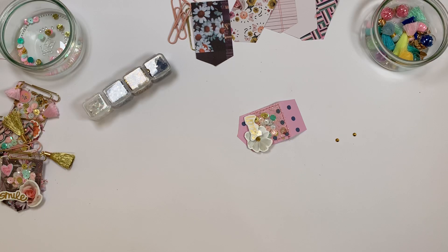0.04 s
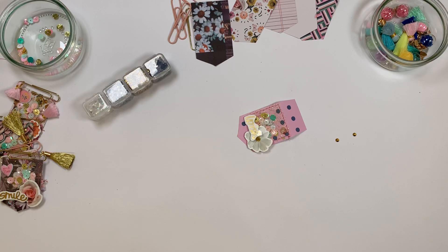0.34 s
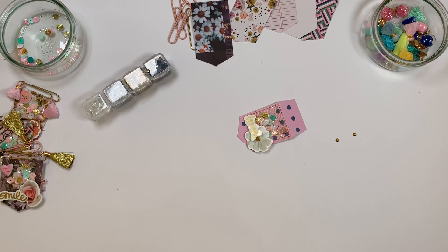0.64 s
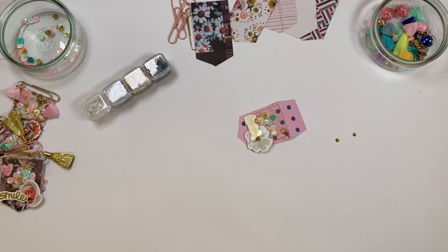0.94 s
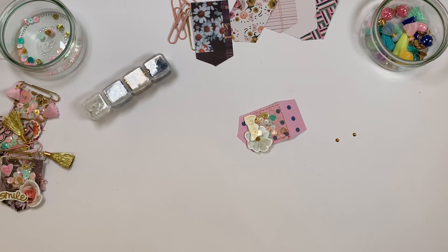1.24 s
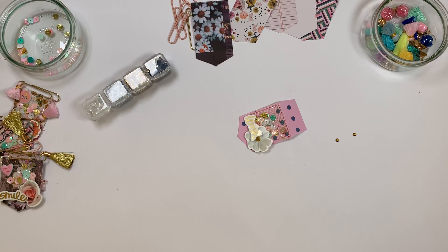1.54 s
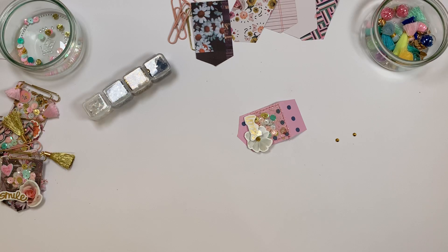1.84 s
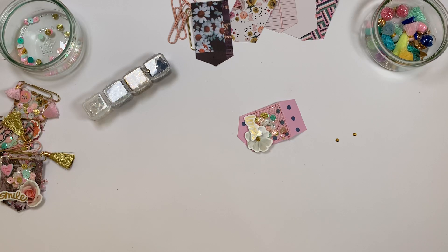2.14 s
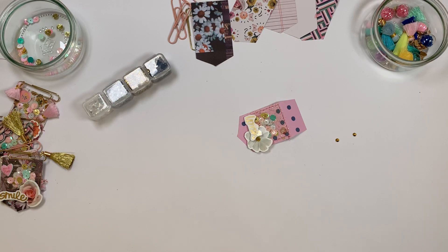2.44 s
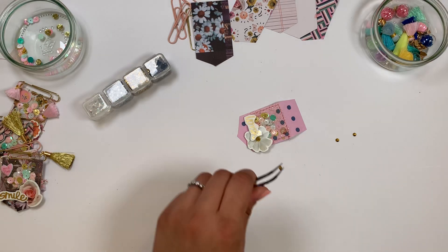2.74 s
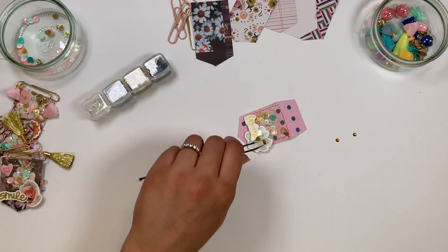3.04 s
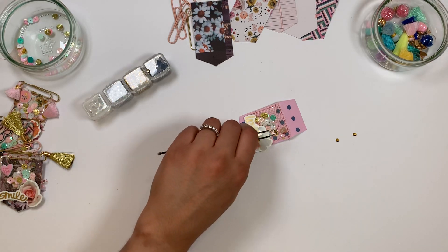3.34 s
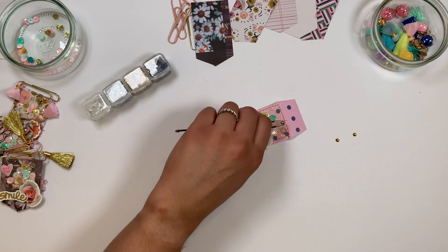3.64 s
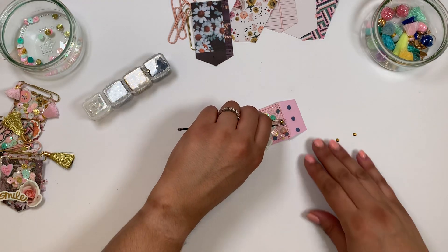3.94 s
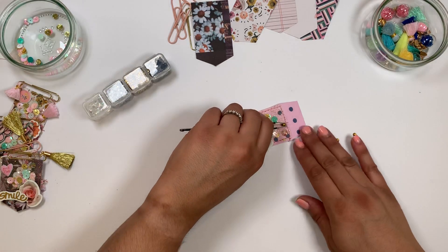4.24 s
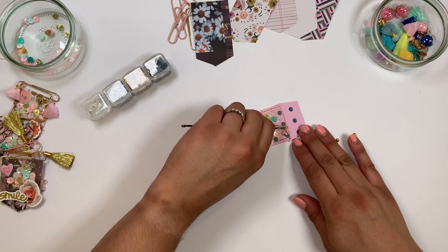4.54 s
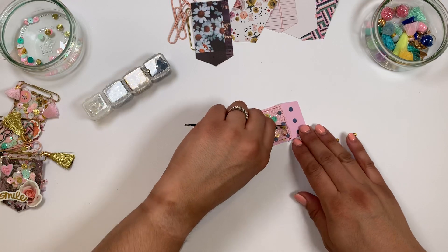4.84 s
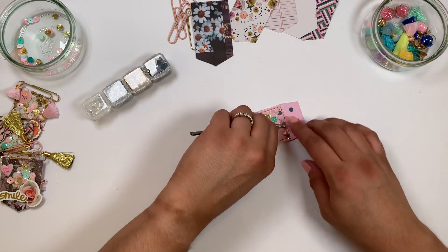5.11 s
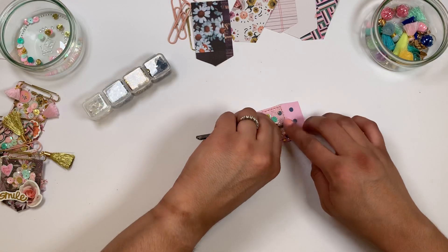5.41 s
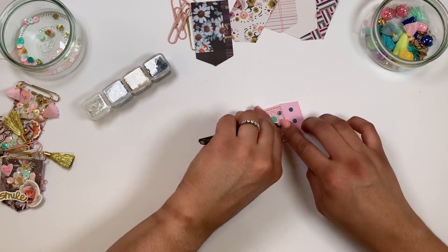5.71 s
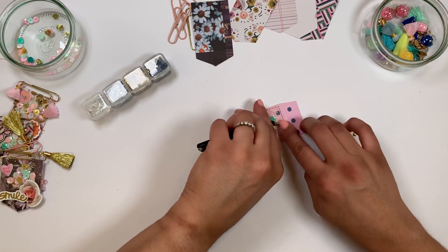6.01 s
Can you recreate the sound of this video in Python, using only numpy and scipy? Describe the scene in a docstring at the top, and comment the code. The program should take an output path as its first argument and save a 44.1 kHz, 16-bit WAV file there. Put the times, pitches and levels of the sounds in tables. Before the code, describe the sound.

A phone above a craft table picks up low ventilation rumble and hum, alone at first. Hollow plastic clacks from a glue gun mix with light metallic clicks of tweezers being picked up. A thump and brief chattering skid follow as the gun is set down, then a knock on the table. The rest is quieter: scattered ticks on beads, soft pats and rubs on a paper tag, and tiny fingernail squeaks.

```python
"""Craft work on a tabletop, over the air rumble and low motor hum of a small room.
From 2 s a hot glue gun clacks in its hollow plastic shell, and steel tweezers click and ring as they
are snatched up. Near 3 s the gun lands with a thump and a short skid, then a hand knocks on the table.
From 4 s nails and tweezer tips tick on small beads and a paper tag while fingers rub over the card.
A phone above the table hears it all through two closely spaced ports."""
import sys
import numpy as np
from scipy import signal
from scipy.fft import rfft, irfft
from scipy.io import wavfile

SR = 44100
rng = np.random.default_rng(int(sys.argv[2]) if len(sys.argv) > 2 else 0)


def unload_wav(signal):
    """Save mono or channel-first audio to the path in sys.argv[1] as 16-bit WAV at rate SR, clipped to [-1, 1]."""
    wavfile.write(
        sys.argv[1],
        SR,
        np.round(np.clip(np.atleast_2d(signal).T, -1, 1) * 32767).astype(np.int16),
    )


N = 271960
TIME = np.arange(N) / SR

# Clacks of the glue gun. Each row: start in seconds, level in dB, contact cutoff in Hz.
GUN_CLACKS = [(1.985, -43, 1694), (2.1828, -17.5, 1300), (2.259, -41, 2700), (2.3858, -25, 2000),
              (2.9275, -25, 840), (3.004, -27, 1610)]
# Its plastic shell. Each row: pitch in Hz, level in dB, t60 in seconds.
GUN_MODES = [(880, -10, 0.0048), (1139, -5, 0.02), (1584, -10, 0.019), (2000, -3.5, 0.006),
             (2760, 0.5, 0.013), (3920, -21, 0.006), (7000, -22.5, .006)]
# Its skid. Each row: start in seconds, level in dB, tilt in dB per octave, chatter t60 in seconds.
GUN_SKIDS = [(3.007, -30.5, -3, 0.18)]
# The skid's EQ. Each row: frequency in Hz, gain in dB.
SKID_EQ = [(500, -14.5), (950, -18), (1200, 0), (1550, -0.5), (1900, -6.5), (2550, 1.5), (3000, 6),
           (3400, -15), (5400, -20), (7000, -44)]

# Gun and hand hit the table. Each row: start in seconds, level in dB, contact cutoff and low cut in Hz.
TABLE_BLOWS = [(2.667, -36.5, 280, 149), (2.95, -34.5, 1270, 60), (2.9602, -5.5, 78, 56),
               (2.978, -20.5, 79.4, 54.7), (3.02, -13.5, 81.4, 55.4), (3.162, -37, 1250, 200),
               (3.1832, -12, 1210, 244), (3.192, -17.5, 173, 69.4), (3.212, -16.5, 201, 102)]
# The tabletop's boom. Each row: pitch in Hz, level in dB, t60 in seconds.
TABLE_MODES = [(75.1, -10.5, 0.21), (94.5, -30.5, 0.45), (123.7, -6, 0.23), (207.3, -13, 0.27),
               (321, -2.5, 0.048), (414, 0.5, 0.066), (442, -1.5, 0.03), (598, -15, 0.068),
               (680, -13, 0.04), (927, -13, 0.02), (1125, -9, 0.012), (1463, -10.5, 0.021),
               (1740, -5, 0.0029)]

# Tweezers touch the table.
# Each row: start in seconds, level in dB, tilt in dB per octave, chatter t60 in seconds.
TWEEZER_CLICKS = [(2.3268, -45.5, -4, 0.014), (2.552, -27, 5, 0.0048), (2.6585, -43, -5.5, 0.016),
                  (2.738, -49, -3.5, 0.054), (2.9514, -43.5, -2.5, 0.06), (3.0038, -36, -6, 0.0074),
                  (3.182, -47.5, -5.5, 0.03), (3.7535, -55.5, 3, 0.019)]
# The click's EQ. Each row: frequency in Hz, gain in dB.
TWEEZER_EQ = [(500, -15.5), (1100, 2.5), (1800, -1.5), (2500, -1.5), (3000, -10.5), (3500, -1.5),
              (4300, 0.5), (5300, -7.5), (6400, -16.5), (7400, -11.5), (8500, -9), (12500, -15),
              (15500, -20.5)]
# Hits that set the arms ringing. Each row: start in seconds, level in dB, contact cutoff in Hz.
TWEEZER_BLOWS = [(2.5524, -31, 11400), (2.6585, -51, 6950), (3.0038, -47.5, 5200)]
# The two steel arms. Each row: pitch in Hz, level in dB, t60 in seconds.
TWEEZER_MODES = [(970, -4, 0.013), (1350, 0, 0.0066), (1520, -16, 0.13), (1727, -14, 0.059),
                 (2060, -1.5, 0.006), (3200, 2.5, 0.00515), (3870, -13.5, 0.0057), (5010, 5.5, 0.0087),
                 (5300, -30.5, 0.3), (5500, -28, 0.282), (5550, 11.5, 0.0028), (6960, -30, 0.2),
                 (7580, 8.5, 0.0046)]
# The tips drag. Each row: start and length in seconds, level in dB, tilt in dB per octave.
TWEEZER_DRAGS = [(2.66, 0.026, -54.5, -4), (2.974, 0.022, -50, 0), (3.158, 0.028, -47.5, -10.5),
                 (3.212, 0.015, -74, -0.5)]
# The drag's EQ. Each row: frequency in Hz, gain in dB.
DRAG_EQ = [(200, -22), (600, -4), (1300, -0.5), (2200, -2.5), (3000, 3), (3500, -2), (4300, 2.5),
           (5400, -6.5), (7800, -8.5), (13000, -11), (15500, -14)]

# Nails and tips tick on beads and card.
# Each row: start in seconds, level in dB, tilt in dB per octave, push on the card in dB.
BEAD_TICKS = [(4.1329, -61, 0, -59), (4.444, -36, 5.5, -39.5), (4.6296, -70, 6, -51),
              (4.925, -47, -3.5, -54.5), (4.933, -53, -5, -62), (4.95, -57, -3, -53), (5.463, -66, -3, -68),
              (5.582, -63.5, 0, -52), (5.687, -58, -2.5, -61), (5.7604, -46, -1, -38.5),
              (5.814, -54.5, 4, -44.5), (6.03, -62, 13, -62), (6.0915, -59, 0, -40.5),
              (6.1102, -47.5, 4.5, -38.5), (6.1173, -45, 4, -38), (6.1227, -27, 11.5, -35),
              (6.1332, -57, 5, -40)]
# The tick's EQ. Each row: frequency in Hz, gain in dB.
TICK_EQ = [(500, -3), (950, -8), (1350, -2), (1700, 4.5), (2050, -1.5), (2700, 4), (3900, 0.5), (5200, -8),
           (6700, -1), (7800, -2.5), (9000, -1.5), (10500, -8), (12000, -7), (14600, -16), (16000, -14)]
# Square hits on a bead. Each row: start in seconds, level in dB, contact cutoff in Hz.
BEAD_BLOWS = [(4.4448, -39, 9000), (4.843, -55, 3340), (6.1227, -50, 5930)]
# A hard little bead. Each row: pitch in Hz, level in dB, t60 in seconds.
BEAD_MODES = [(2630, 1.5, 0.011), (3240, 4.5, 0.004), (4020, 4.5, 0.0046), (4640, -1, 0.0052),
              (6680, 4, 0.006)]
# The card pressed on the table. Each row: pitch in Hz, level in dB, t60 in seconds.
CARD_MODES = [(285, -5.5, 0.074), (469, -3.5, 0.059), (558, -2.5, 0.029), (819, -10, 0.074),
              (1366, -5, 0.017), (2230, -8, 0.013)]
# A nail on the card. Each row: start and length in seconds, level in dB, tilt in dB per octave.
NAIL_RASPS = [(4.05, 0.018, -78.5, -6), (4.927, 0.017, -66.5, -8), (4.962, 0.033, -78, -2),
              (5.076, 0.013, -76, 0), (5.684, 0.004, -76, 3), (5.7601, 0.002, -67, 6)]
# The rasp's EQ. Each row: frequency in Hz, gain in dB.
RASP_EQ = [(500, -48), (3500, -24), (5700, -10), (6500, -1), (7200, 1), (8300, -11), (10000, -26.5),
           (15000, -26)]
# Fingers slide over the card. Each row: fastest moment in seconds, level in dB.
FINGER_STROKES = [(4.06, -74), (4.15, -72.5), (4.951, -75), (5.087, -75.5), (6.15, -66.5)]
# The rub's EQ. Each row: frequency in Hz, gain in dB.
RUB_EQ = [(500, -4), (2000, 11), (3500, 5.5), (5300, -3.5), (6400, -9.5), (7500, -8), (9000, 0),
          (15000, -10)]

# The room's reverb. Each row: frequency in Hz, t60 in seconds, tail level in dB.
ROOM_REVERB = [(102, 1, -5), (405, 0.36, -8), (1193, 0.34, 3), (2520, 0.88, -5.5), (3970, 0.36, -4.5),
               (6780, 0.36, -10.5), (14700, 0.18, -4.5)]
# How alike diffuse sound is at the two ports. Each row: frequency in Hz, correlation.
PORT_LIKENESS = [(60, 0.96), (280, 0.76), (480, 0.4), (750, 0.0169), (6000, 0.012), (7200, 0.99),
                 (9000, 0.9), (10300, 1), (12000, 1), (13500, 1)]
# Ventilation rumble and faint hiss. Each row: frequency in Hz, noise density in dB per Hz.
AIR_SPECTRUM = [(15, -77), (26, -64.5), (36, -69), (70, -72), (125, -74.5), (160, -84), (290, -88.5),
                (450, -93), (1100, -97.5), (2100, -104), (3700, -120), (6400, -126), (8400, -123.5),
                (14300, -128.5), (15300, -139)]
# Motor hum. Each row: pitch in Hz, level in dB.
HUM_TONES = [(97, -60), (120, -61)]


def glue_gun():
    """The hollow shell clacks, then chatters in a short skid as it is put down."""
    clacks = struck(GUN_CLACKS, GUN_MODES, scatter=0.02)
    skid = clicks(GUN_SKIDS, SKID_EQ, grit_db=3.5, snap_s=0.0016, rise_share=0.014, size=16384)
    return clacks + skid


def table_thumps():
    """A light, hard knock rings the hollow middle modes; only a heavy push moves the deep ones."""
    out = np.zeros(N)
    for start, level_db, cutoff_hz, low_cut_hz in TABLE_BLOWS:
        thump = struck([(start, level_db, cutoff_hz)], TABLE_MODES, scatter=0.004)
        low_cut = signal.butter(2, low_cut_hz, "highpass", fs=SR, output="sos")
        out += signal.sosfilt(low_cut, thump + 1e-18)
    return out


def tweezer_clicks():
    """Steel clicks on the table; some hits leave a few thin tones hanging in the arms."""
    contacts = clicks(TWEEZER_CLICKS, TWEEZER_EQ, grit_db=0, snap_s=0.0039)
    return contacts + struck(TWEEZER_BLOWS, TWEEZER_MODES, scatter=0.001)


def tweezer_scratches():
    """The steel tips scratch over table and card."""
    return drags(TWEEZER_DRAGS, DRAG_EQ, grit_db=2.5, bite_s=0.00078, release_s=0.0068)


def bead_ticks(snap_t60=0.0063, settle_after_s=0.006, settle_db=-10.5, settle_t60=0.079):
    """A bead snaps, then settles with a softer, longer chatter; a square hit makes it ring."""
    snaps = [(start, db, tilt, snap_t60) for start, db, tilt, _ in BEAD_TICKS]
    settles = [(start + settle_after_s, db + settle_db, tilt, settle_t60)
               for start, db, tilt, _ in BEAD_TICKS]
    ticks = clicks(snaps + settles, TICK_EQ, grit_db=-3, snap_s=0.0034)
    return ticks + struck(BEAD_BLOWS, BEAD_MODES, scatter=0.0088)


def card_pats(cutoff_hz=2380):
    """The soft fingertip push behind each tick pats the card against the table."""
    pushes = [(start, push_db, cutoff_hz) for start, _, _, push_db in BEAD_TICKS]
    return struck(pushes, CARD_MODES, scatter=0.02)


def nail_rasps():
    """A fingernail catches on the card with a thin squeak."""
    return drags(NAIL_RASPS, RASP_EQ, grit_db=2.5, bite_s=0.0011, release_s=0.008)


def finger_rub(grit_db=5, down_s=3.9, resting_db=-83.5, rise_s=0.058, fall_s=0.027):
    """Skin catches on the paper grain in tiny slips: short strokes over a faint, steady shifting."""
    slips = rng.standard_normal(N) * undb(grit_db * rng.standard_normal(N))
    rub = irfft(rfft(slips) * undb(curve(RUB_EQ, bins(N))), N)
    effort = undb(resting_db) * np.clip(TIME - down_s, 0, 1)  # resting fingers never lie quite still
    for peak_s, level_db in FINGER_STROKES:
        stroke = np.exp(-np.maximum((peak_s - TIME) / rise_s, (TIME - peak_s) / fall_s))
        effort += undb(level_db) * stroke
    return rub / rub.std() * effort


def struck(blows, modes, scatter, size=22050):
    """Blows ring a body; a soft contact leaves the high modes quiet."""
    out, t = np.zeros(N), TIME[:size]
    hz, db, t60 = np.transpose(modes)[:, :, None]
    sign = (-1) ** np.arange(len(modes))[:, None]  # neighbouring modes swing against each other
    for start, level_db, cutoff_hz in blows:
        detune = 1 + scatter * rng.standard_normal(hz.shape)
        partials = sign * undb(db) * decay(t, t60) * np.sin(2 * np.pi * hz * detune * t)
        contact = signal.butter(3, min(cutoff_hz, SR / 3), fs=SR, output="sos")
        add(out, start, undb(level_db) * signal.sosfilt(contact, partials.sum(axis=0)))
    return out


def clicks(events, eq, grit_db, snap_s, rise_share=0.035, size=4096):
    """Hard little contacts: one impact and a fading chatter, coloured by the object."""
    out, t = np.zeros(N), TIME[:size]
    for start, level_db, tilt_db, t60 in events:
        push, weight = rng.standard_normal((2, size))
        attack = 1 - np.exp(-t / (rise_share * t60))  # a long scrape takes longer to bite
        envelope = decay(t, t60) * attack
        force = push * undb(grit_db * weight) * envelope
        # the briefer the contact, the more of it lies in the main impact
        force[np.argmax(envelope)] += np.linalg.norm(force) * snap_s / t60
        click = signal.fftconvolve(force, minimum_phase(tilted_eq(eq, tilt_db, size)))
        packed_rms = np.sqrt(np.sum(click ** 2) * 1000 / SR)  # all its energy in one millisecond
        add(out, start, undb(level_db) * click / packed_rms)
    return out


def drags(events, eq, grit_db, bite_s, release_s, size=8192):
    """A dragged tip makes a dense run of tiny slips until it lifts off."""
    out, t = np.zeros(N), TIME[:size]
    for start, length_s, level_db, tilt_db in events:
        push, weight = rng.standard_normal((2, size))
        force = push * undb(grit_db * weight)
        slips = irfft(rfft(force) * tilted_eq(eq, tilt_db, size))
        pressure = (1 - np.exp(-t / bite_s)) * np.exp(-np.maximum(t - length_s, 0) / release_s)
        add(out, start, undb(level_db) * pressure * slips / slips.std())
    return out


def room(sound, early_db, early_t60, walls_db, pan_db, wall_rise_s=0.00041, size=32768):
    """Direct sound, quick scatter off things on the table, and the walls' tail, octave by octave."""
    t, hz = TIME[:size], bins(size)
    centres = np.geomspace(60, 15360, 9)
    noise, tail = diffuse(size), 0
    for centre, band_gains in zip(centres, np.eye(len(centres))):
        band = irfft(noise * curve(np.c_[centres, band_gains], hz))
        fade = decay(t, curve(ROOM_REVERB, centre)) * (1 - np.exp(-t / wall_rise_s))
        tail += band * fade / np.linalg.norm(fade) * undb(curve(ROOM_REVERB, centre, column=2))
    low_cut = hz ** 2 / (hz ** 2 + 800 ** 2)  # long waves pass small things by
    fade = decay(t, early_t60)
    early = irfft(diffuse(size) * low_cut) * fade / np.linalg.norm(fade)
    direct = 1 / np.hypot(1, undb(early_db))  # what scatters is lost to the direct path
    pan = undb(np.array([[pan_db], [-pan_db]]) / 2)
    reverb = undb(walls_db) * tail + direct * undb(early_db) * early
    return direct * pan * sound + signal.fftconvolve(sound[None], reverb, axes=1)[:, :N]


def motor_hum(waver=0.94, smoothing_samples=8000):
    """Two low motor tones waver in level and phase."""
    window = np.hanning(smoothing_samples)[None]
    window /= np.linalg.norm(window)
    hum = np.zeros(N)
    for hz, db in HUM_TONES:
        swell, drift = signal.fftconvolve(rng.standard_normal((2, N)), window, "same", axes=1)
        hum += np.sqrt(2) * undb(db) * (1 + waver * swell) * np.sin(2 * np.pi * hz * TIME + drift)
    return hum


def ventilation():
    """Moving air lays a steady bed of rumble and faint hiss."""
    return irfft(diffuse(N) * undb(curve(AIR_SPECTRUM, bins(N))), N) * np.sqrt(SR / 2)


def diffuse(size):
    """Spectra of white noise reaching the two ports from all sides."""
    alike = np.clip(curve(PORT_LIKENESS, bins(size)), 0, 0.995)
    mid, side = rfft(rng.standard_normal((2, size)))
    return np.sqrt((1 + alike) / 2) * mid + np.sqrt((1 - alike) / 2) * side * np.array([[1], [-1]])


def tilted_eq(eq, tilt_db, size):
    """Gains of an EQ tilted around 5 kHz; the tilt levels off below 500 Hz."""
    hz = bins(size)
    octaves = np.log2(np.maximum(hz, 500) / 5000)
    return undb(curve(eq, hz) + tilt_db * octaves)


def minimum_phase(gain):
    """The tightest impulse response with this gain curve."""
    cepstrum = irfft(np.log(gain))
    half = len(cepstrum) // 2
    cepstrum[1:half] *= 2
    cepstrum[half + 1:] = 0
    return irfft(np.exp(rfft(cepstrum)))


def decay(t, t60):
    """A fade that falls 60 dB in t60 seconds."""
    return np.exp(-np.log(1000) * t / t60)


def undb(db):
    """Decibels to gain."""
    return 10 ** (np.asarray(db) / 20)


def curve(points, hz, column=1):
    """Read a table's column on a log-frequency axis."""
    table = np.transpose(points)
    return np.interp(np.log(np.maximum(hz, 1)), np.log(table[0]), table[column])


def bins(size):
    """Frequencies of a spectrum of this many samples."""
    return np.fft.rfftfreq(size, 1 / SR)


def add(track, start_s, sound):
    """Mix a sound in at its cue."""
    start = int(start_s * SR)
    track[start:start + len(sound)] += sound[:N - start]


def scene():
    """Each source gets its own pan and share of the room, over the air and the hum."""
    gun = glue_gun()
    tweezers = tweezer_clicks()
    scratches = tweezer_scratches()
    beadwork = bead_ticks() + card_pats() + finger_rub() + nail_rasps()
    return (room(gun, early_db=-0.5, early_t60=0.033, walls_db=-7.0, pan_db=-1.0)
            + room(table_thumps(), early_db=0.5, early_t60=0.041, walls_db=-5.0, pan_db=2.0)
            + room(tweezers, early_db=-4.5, early_t60=0.052, walls_db=1.0, pan_db=-3.0)
            + room(scratches, early_db=-1.0, early_t60=0.032, walls_db=-1.5, pan_db=-1.5)
            + room(beadwork, early_db=2.0, early_t60=0.024, walls_db=-4.0, pan_db=-1.5)
            + ventilation() + motor_hum())


def record(dry):
    """Sound reaches the left port a little late; the phone cuts the top."""
    port_lag_s, top_hz = 0.000144, 15900
    left = irfft(rfft(dry[0]) * np.exp(-2j * np.pi * bins(N) * port_lag_s), N)
    high_cut = signal.ellip(10, 0.2, 70, top_hz, fs=SR, output="sos")
    return signal.sosfilt(high_cut, np.array([left, dry[1]]))


dry = scene()
out = record(dry)
unload_wav(out)
```